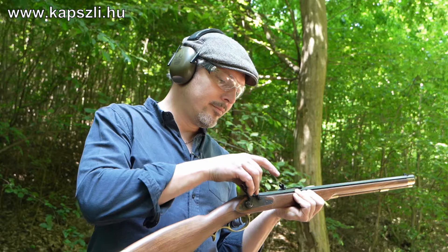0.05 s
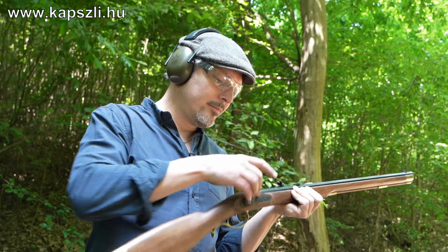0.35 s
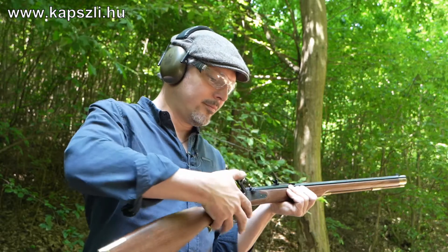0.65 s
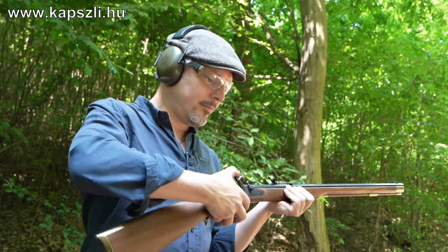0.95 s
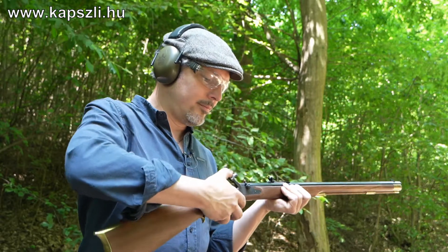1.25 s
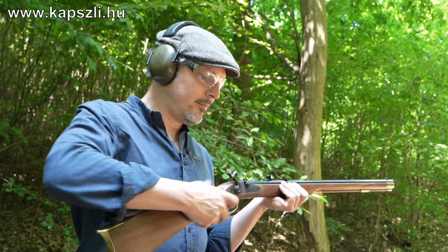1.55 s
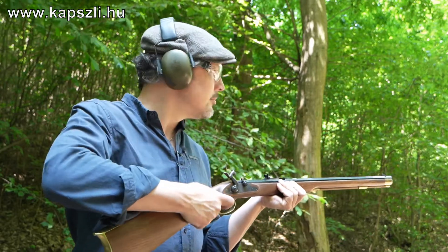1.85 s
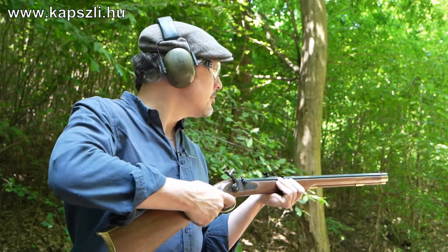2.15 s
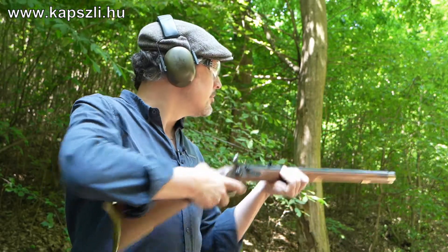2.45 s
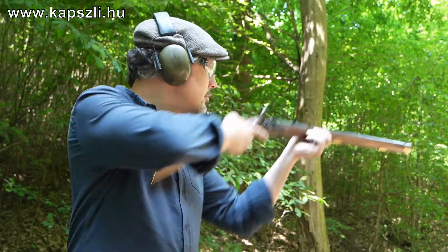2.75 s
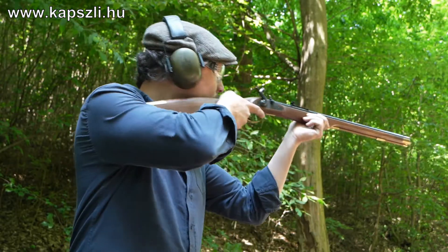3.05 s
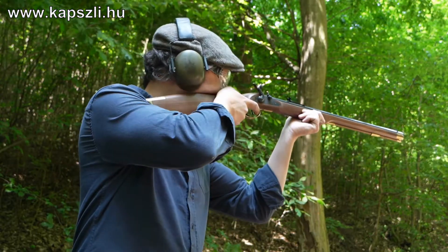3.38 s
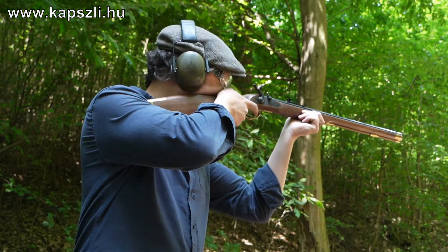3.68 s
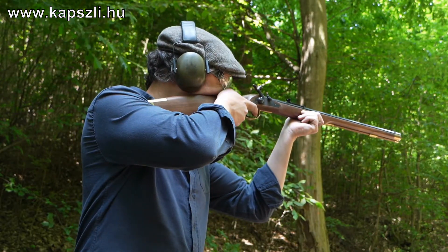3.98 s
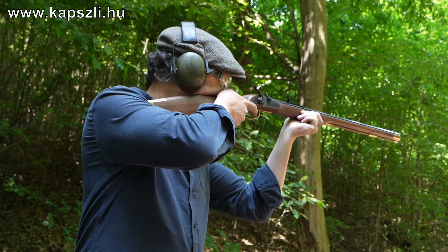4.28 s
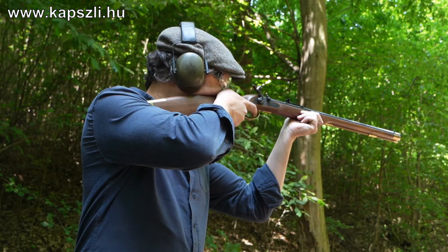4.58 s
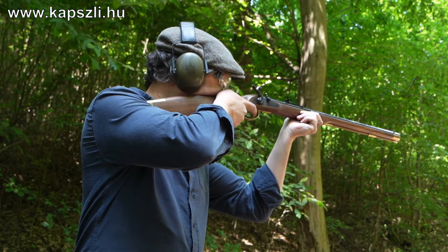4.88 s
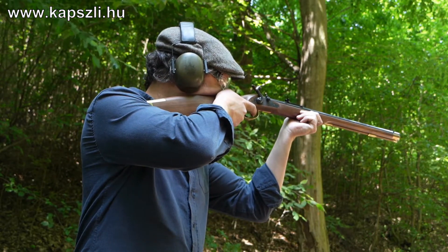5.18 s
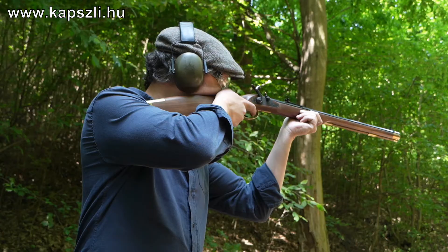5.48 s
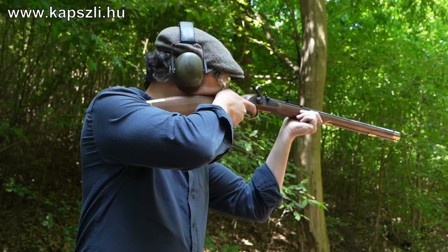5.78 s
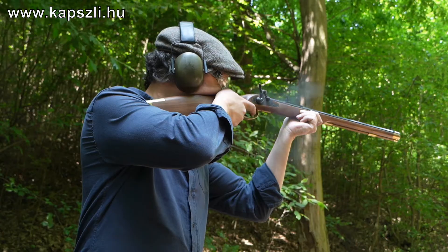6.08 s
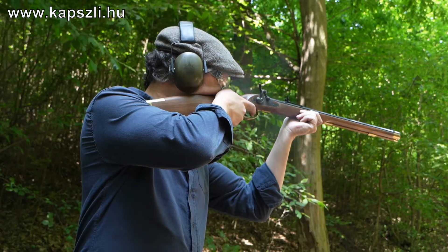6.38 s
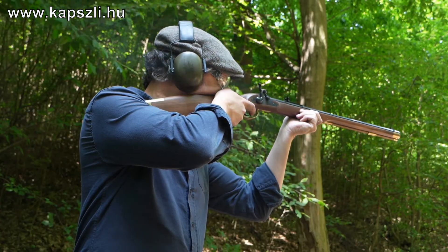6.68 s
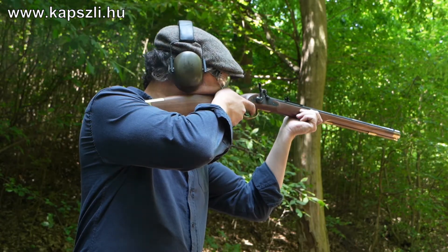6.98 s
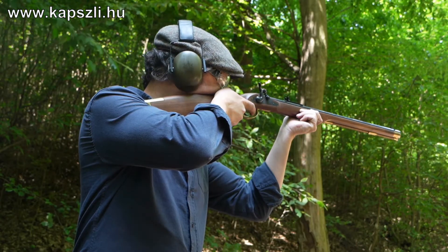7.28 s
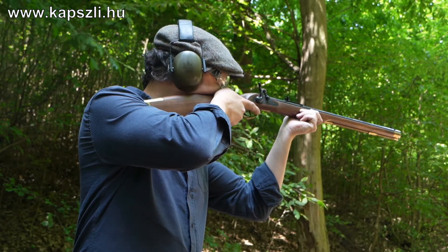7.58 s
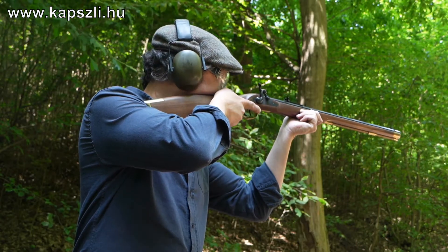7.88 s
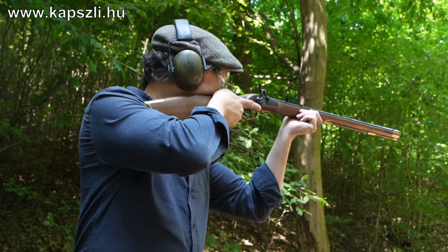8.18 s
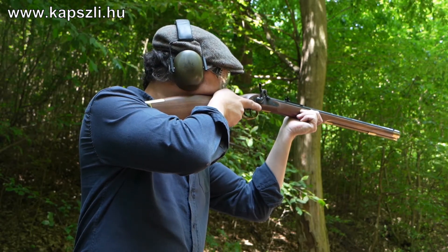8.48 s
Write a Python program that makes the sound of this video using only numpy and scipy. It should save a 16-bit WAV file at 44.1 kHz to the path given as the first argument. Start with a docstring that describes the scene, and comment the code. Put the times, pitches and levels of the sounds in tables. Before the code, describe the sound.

A rifle lock clicks, sleeves rustle, and after a pause one sharp crack echoes through a wood with faint birdsong.

```python
"""A muzzleloader in a leafy wood

A rifle is cocked and shouldered: impacts in the lock and on the stock excite damped modes, and sleeves
rustle by friction. The percussion lock fires; the blast overloads the microphone and rolls away as the
trees scatter it. One songbird warbles, another spins an accelerating trill and a third calls from far
off, all reverberating between the trunks over the hush of a breeze."""
import sys
import numpy as np
from scipy import signal
from scipy.fft import rfft, irfft, next_fast_len
from scipy.io import wavfile

SR = 44100
rng = np.random.default_rng(int(sys.argv[2]) if len(sys.argv) > 2 else 0)


def bounce(signal):
    """Save signal as a 16-bit WAV file at the path given by the first command-line argument."""
    frames = np.transpose(np.atleast_2d(signal))
    limited = np.clip(frames, -1, 1)
    pcm = np.round(limited * 32767).astype(np.int16)
    wavfile.write(sys.argv[1], SR, pcm)


N = 385740

# noise spectra of the gas jet, its roll through the wood and a dull, far answer: f/Hz, level/dB
JET_SPECTRUM = [(35, -43), (60, -16.5), (149, -11.5), (666, -5), (822, -4), (1220, -7.5), (1340, -6.5),
                (1820, -7), (2090, -6), (2840, -8.5), (4320, -8), (5090, -5), (7940, -12), (13000, -14.5),
                (16000, -22)]
ROLL_SPECTRUM = [(40, -35.5), (110, -19), (175, -18.5), (250, -28), (310, -16), (400, -12), (800, -13.5),
                 (1150, -9.5), (1700, -6.5), (2400, -9), (3800, -2.5), (5800, -4.5), (8000, -14),
                 (10500, -11.5), (16000, -34.5)]
ANSWER_SPECTRUM = [(100, -58), (280, -14.5), (450, -4.5), (780, 1), (1200, -6), (1700, -5), (3000, -14),
                   (8000, -51)]
# stereo width of the shot and its echoes: f/Hz, side minus mid/dB
SHOT_WIDTH = [(50, -13.5), (700, -30), (4000, -28), (8000, -16.5), (15000, -13)]
# modes of the barrel and its air column: f/Hz, level/dB, T60/s
BORE_MODES = [(172, -6.5, 0.05), (836, -12, 0.17), (2104, 2.5, .05)]
# reflections from single trunks: t/s, level/dB, pulse width/s
TRUNK_ECHOES = [(6.202, 10, .00007), (6.247, 1, 0.00015), (6.2864, 10, 0.000094), (6.2946, -6, 0.000096)]

def shot(fire_s=6.1285, jet_hold_s=.017, jet_rise_s=.00068, jet_t60=.11):
    """Blast wave: expanding gas drives a pressure front and a turbulent jet; trees reflect the sound."""
    t, out = np.arange(2 * SR) / SR, np.zeros((2, N))
    jet = decay(t, jet_t60, jet_hold_s) * rise(t, jet_rise_s)
    roll = tree_scatter(ROLL_SPECTRUM, hold_s=.099, grain_db=0, width=SHOT_WIDTH) * rise(t, .052)
    answer = tree_scatter(ANSWER_SPECTRUM, hold_s=.022, grain_db=2, width=SHOT_WIDTH) * rise(t, .016)
    add(out, fire_s, -from_db(8) * pressure_pulse(width_s=.00027))   # the front
    add(out, fire_s, jet * noise(JET_SPECTRUM, len(t), SHOT_WIDTH) + from_db(-13) * roll)
    add(out, fire_s, struck(BORE_MODES))
    # a low thump just after the crack
    add(out, fire_s + .009, from_db(-3) * pressure_pulse(width_s=.0012))
    add(out, fire_s + .075, from_db(-19) * answer)
    for s, db, width_s in TRUNK_ECHOES:
        add(out, s, from_db(db) * pressure_pulse(width_s))
    return out


def pressure_pulse(width_s):
    """Friedlander wave: a sudden compression followed by a weaker, longer rarefaction."""
    phase = np.arange(SR // 25) / SR / width_s
    return (1 - phase) * np.exp(-phase)


# modes of stock, lock plate and barrel: f/Hz, level/dB, T60/s
RIFLE_MODES = [(340, -17, .04), (585, -18, 0.068), (940, -30, 0.018), (1478, -1, 0.07), (1540, 3.5, 0.025),
               (2190, 3, 0.028), (2370, -9, .04), (2605, -5, 0.072), (3010, 2.5, 0.023),
               (3424, -20.5, 0.046), (4320, -7, .035), (4970, -11.5, 0.032), (6700, -15, 0.038),
               (8317, -12.5, .025)]
# modes of a hand-damped knock and of the sear snapping into its notch: frequency ratio, level/dB, T60/s
KNOCK_MODES = [(.52, -16.5, .02), (.8, -3, .016), (1.002, 5, 0.016), (1.17, -4, 0.02), (1.7, -19.5, 0.011),
               (2.3, -14, 0.005)]
SNAP_MODES = [(0.598, -3.5, .007), (.79, 6.5, 0.0029), (0.971, 3.5, 0.0052), (1.059, -6.5, 0.0096),
              (1.32, 0.5, .004), (1.778, 1, 0.0029), (2.199, -6, .003)]
# steel grating on steel: f/Hz, level/dB; and its stereo width: f/Hz, side minus mid/dB
GRIT_SPECTRUM = [(100, -8.5), (500, -0.5), (4000, -0.5), (8000, -3), (13000, 4), (16000, -3)]
GRIT_WIDTH = [(100, -4), (16000, -5.5)]
# clicks of the lock: t/s, ring level/dB, knock level/dB, knock f/Hz, snap level/dB, snap f/Hz
LOCK_CLICKS = [(1.153, -12.5, -9, 2990, 4, 7040), (1.3496, -37, -19, 2355, -25.5, 5170),
               (1.378, -60, -46, 2520, -41, 6540), (2.2107, -27, -15, 2840, -0.5, 5120),
               (2.349, -40, -26, 1930, -37, 8100)]
# hands and shoulder bump the stock: t/s, knock level/dB, knock f/Hz, level of the fittings' tick/dB
STOCK_BUMPS = [(2.162, -37.5, 1620, -46), (2.3553, -33.5, 1470, -55), (2.443, -40, 774, -31),
               (2.508, -33.5, 2380, -39), (2.592, -35, 1640, -35), (2.654, -32, 1680, -34),
               (2.675, -33.5, 1320, -74), (2.828, -37.5, 616, -47), (2.919, -47, 895, -54),
               (2.977, -44, 710, -45), (3.047, -40, 960, -43), (3.092, -36, 615, -47),
               (3.23, -32.5, 586, -39), (3.429, -35, 570, -34), (7.320, -40, 1590, -43),
               (7.943, -41.5, 1123, -36.5), (7.984, -42.5, 790, -40.5), (8.124, -47.5, 690, -49)]

def rifle_handling(body_rise_s=.0006, snap_rise_s=.00028, bump_ring_db=-13, tick_hz=4870, grit_db=-25):
    """Impact excitation: each contact snaps and grates the steel, knocks the wood and rings the rifle."""
    hz, mode_db, t60 = np.transpose(RIFLE_MODES)
    t, impacts, grit = np.arange(SR // 6) / SR, np.zeros(N), np.zeros((2, N))
    bumps = [(s, db + bump_ring_db, db, knock_hz, tick_db, tick_hz)
             for s, db, knock_hz, tick_db in STOCK_BUMPS]
    for s, ring_db, knock_db, knock_hz, snap_db, snap_hz in LOCK_CLICKS + bumps:
        ring_hz = hz * rng.normal(1, .0073, len(hz))   # no two blows ring quite alike
        uneven_db = mode_db + rng.normal(0, .64, len(hz))
        ring = struck(zip(ring_hz, uneven_db, t60), gain_db=ring_db)
        knock = struck(KNOCK_MODES, knock_hz, knock_db)
        snap = struck(SNAP_MODES, snap_hz, snap_db)
        add(impacts, s, (ring + knock) * rise(t, body_rise_s) + snap * rise(t, snap_rise_s))
        grating = noise(GRIT_SPECTRUM, len(t), GRIT_WIDTH) * decay(t, t60=.031)
        add(grit, s, from_db(snap_db + grit_db) * grating)
    near = early_reflections(impacts, wet_db=-18, t60=.07, spread=.8)
    return wood_reverb(near + grit, wet_db=-37, hold_s=.012, rise_s=.006)


# friction spectra of cloth, a dull rub and a hiss: f/Hz, level/dB
RUB_SPECTRUM = [(41, -25.5), (70, 2.5), (368, -8.5), (504, -5.5), (660, -9), (744, -10.5), (1750, -17),
                (2500, -41.5), (3250, -54), (5500, -120)]
HISS_SPECTRUM = [(880, -25), (1500, -19), (2270, -2.5), (2610, -6), (3060, -7.5), (8000, -9.5),
                 (16000, -16)]
# strokes of the arms: t/s, duration/s, relative rub level/dB, relative hiss level/dB
SLEEVE_STROKES = [(1.428, 0.18, -56, -55), (1.617, 0.32, -53.5, -61.5), (2.402, 0.11, -51.5, -52),
                  (2.547, 0.23, -49, -53.5), (2.778, 0.16, -48.5, -57), (2.958, 0.21, -46.5, -54.5),
                  (3.081, 0.15, -48.5, -50)]

def sleeves(rub_gain_db=-2, hiss_gain_db=1, attack_s=.053, release_t60=.28):
    """Stick-slip friction: sliding cloth radiates grainy noise that builds, holds and dies each stroke."""
    t, rub, hiss = np.arange(SR) / SR, np.zeros(N), np.zeros(N)
    for s, length, rub_db, hiss_db in SLEEVE_STROKES:
        stroke = np.minimum(t / attack_s, 1) * decay(t, release_t60, hold_s=length)
        add(rub, s, from_db(rub_db + rub_gain_db) * stroke)
        add(hiss, s, from_db(hiss_db + hiss_gain_db) * stroke)
    rub *= from_db(3 * flutter(83, N))
    hiss *= from_db(2 * flutter(280, N))
    return rub * noise(RUB_SPECTRUM, N) + hiss * noise(HISS_SPECTRUM, N)


# notes of a near and a far bird: t/s, duration/s, first f/Hz, last f/Hz, relative level/dB
NEAR_SONG = [(1.80, .031, 4200, 3620, -49.5), (1.916, .035, 2750, 3400, -44),
             (1.973, .036, 3250, 2500, -47.5), (3.835, .05, 3450, 4300, -45),
             (3.932, .085, 2550, 3430, -42.5), (4.105, .055, 3950, 2300, -42.5),
             (4.185, .04, 2150, 2480, -43.5), (4.342, .054, 2000, 2600, -43.5),
             (4.436, .047, 3140, 3070, -37), (4.66, .028, 4800, 4204, -47),
             (4.816, .076, 2550, 2950, -40.5), (4.905, .03, 2990, 2965, -35),
             (5.125, .068, 4100, 3300, -40), (5.182, .032, 3100, 2680, -37.5),
             (5.272, .056, 4500, 4600, -46), (5.342, .039, 4500, 3740, -38), (5.452, .027, 3900, 2750, -44),
             (5.472, 0.029, 2492, 2380, -39.5), (5.504, 0.023, 2416, 2146, -42.5),
             (5.668, .098, 3800, 3240, -34), (5.821, .041, 4200, 4125, -34.5),
             (5.999, .026, 4150, 2700, -38.5), (6.026, .12, 2500, 3250, -34),
             (6.542, .061, 3500, 3620, -34.5), (6.60, .043, 3400, 2744, -37.5),
             (6.667, .024, 2900, 3093, -35.5), (6.771, .085, 4600, 3750, -38.5),
             (6.921, .034, 3850, 3090, -40.5), (6.943, .046, 3100, 3005, -31),
             (6.997, .033, 2950, 2730, -43.5), (7.075, .095, 2200, 2525, -39)]
FAR_SONG = [(1.55, 0.056, 1840, 1970, -55), (1.58, 0.032, 2490, 2420, -52.5),
            (1.76, 0.1, 2200, 2320, -53.5), (2.02, 0.066, 1905, 1800, -51), (2.49, 0.016, 4450, 4150, -43),
            (3.25, 0.13, 2146, 2080, -59), (3.83, 0.073, 2470, 2350, -63), (3.93, 0.07, 2250, 2030, -57),
            (4.63, .045, 1580, 1710, -59.5), (4.72, 0.054, 1995, 2130, -57), (4.9, 0.074, 2455, 2454, -55),
            (5.01, .045, 2030, 2200, -55), (5.57, .029, 1880, 1720, -60), (8.5, 0.043, 2080, 2500, -65.5)]

def songbirds():
    """Direct-to-reverberant ratio: leaves blur the near song; the far one arrives mostly as echo."""
    near = from_db(-2) * whistles(NEAR_SONG, waver=.005, slide_waver=.27)
    far = from_db(-10) * whistles(FAR_SONG, waver=.025, slide_waver=.15)
    near = early_reflections(near, wet_db=-13.5, t60=.12, spread=.05)
    return (wood_reverb(near, wet_db=-5, hold_s=.02, rise_s=.0072)
            + wood_reverb(far, wet_db=9.5, hold_s=.017, rise_s=.0055))


def whistles(notes, waver, slide_waver, glide_s=.022):
    """Frequency modulation: each tone glides exponentially to its pitch, trembling more in fast slides."""
    out = np.zeros(N)
    for s, length, first_hz, last_hz, db in notes:
        t = np.arange(int(length * SR)) / SR
        remaining = np.exp(-t / glide_s)
        glide_hz = last_hz + (first_hz - last_hz) * (remaining - remaining[-1]) / (1 - remaining[-1])
        depth = waver + slide_waver * remaining * abs(np.log(last_hz / first_hz))
        hz = glide_hz * (1 + depth * flutter(600, len(t)))
        envelope = np.sqrt(np.abs(np.sin(np.pi * t / length)))
        add(out, s, from_db(db) * envelope * tone(hz))
    return out


# one upward flick of the trill: t/s from its onset, f/Hz before the pitch ratio, relative level/dB
FLICK_SWEEP = [(0, 3450, -10), (.007, 4100, -3), (.012, 4620, -.5), (.017, 5200, -1), (.020, 5600, 0),
               (.023, 6050, 1.5), (.028, 6800, -1.5), (.034, 7550, -8)]
# runs of flicks: start t/s, end t/s, period/s, change of period per flick/s
TRILL_RUNS = [(2.066, 3.0, .126, 0), (3.279, 3.9, .1137, 0), (3.95, 4.17, .101, -.015),
              (4.209, 6.0, .0616, .00028)]
# how hard the bird sings: t/s, level/dB, gain of the sweep's lower part/dB, pitch ratio
TRILL_EFFORT = [(2.1, -50.5, -28, 1.19), (3.0, -63, -30, 0.9), (3.3, -42.5, -13, 1.04),
                (3.7, -44, -9.5, 1.004), (4.25, -46, -1.5, 0.97), (4.7, -45.5, 2.5, 1.0),
                (5.6, -44, -4, .99), (6.0, -52, 2.5, 0.99)]

def trilling_bird(lead_s=.025, min_period_s=.05, waver=.013, uneven_db=2, notch_hz=5550, notch_q=5):
    """Chirp train: rising sweeps hurry into a trill; a notch splits each direct one into chirp and tick."""
    flick_s, flick_hz, flick_db = np.transpose(FLICK_SWEEP)
    effort_s, *effort = np.transpose(TRILL_EFFORT)
    t, trill = np.arange(int(flick_s[-1] * SR)) / SR, np.zeros(N)
    sweep_hz, sweep_db = np.interp(t, flick_s, flick_hz), np.interp(t, flick_s, flick_db)
    lower_part = np.interp(sweep_hz, [5600, 6000], [1, 0])
    window = signal.windows.tukey(len(t), .15)
    for start, end, period, change in TRILL_RUNS:
        periods = np.maximum(period + change * np.arange(40), min_period_s)
        times = start + np.append(0, np.cumsum(periods))
        for s in times[times < end]:
            db, lower_db, pitch = (np.interp(s, effort_s, column) for column in effort)
            hz = pitch * sweep_hz * (1 + waver * flutter(500, len(t)))
            level_db = db + sweep_db + lower_db * lower_part + uneven_db * flutter(200, len(t))
            add(trill, s - lead_s, from_db(level_db) * window * tone(hz))
    # the middle of the sweep arrives only as echo
    direct_middle = signal.lfilter(*signal.iirpeak(notch_hz, notch_q, fs=SR), trill)
    return wood_reverb(trill, wet_db=-2, hold_s=.06, rise_s=.008) - direct_middle


# spectra of the breeze's hush and of its swells: f/Hz, level/dB
HUSH_SPECTRUM = [(12, -29), (20, 1.5), (44, -1.5), (91, -8), (123, -12), (285, -17), (388, -14), (558, -16),
                 (1710, -26), (2200, -23), (3160, -27), (4670, -28.5), (5850, -33), (14700, -36),
                 (16000, -44.5)]
SWELL_SPECTRUM = [(60, -12), (200, 1), (400, 5), (700, -4.5), (1400, -14), (2200, -8.5), (4500, -19.5),
                  (7000, -31.5), (16000, -39.5)]
# soft swells: peak t/s, half width/s, level/dB
BREEZE_SWELLS = [(.25, 0.19, -55.5), (1.8, 0.5, -68.5), (3.6, 0.55, -59.5), (8.55, 0.31, -62)]

def breeze(hush_db=-52.5, waver_db=1.33):
    """Flow noise: moving air makes a low, wavering hush with a few Gaussian swells."""
    t = np.arange(N) / SR
    swells = sum(from_db(db) * np.exp(-((t - s) / width) ** 2) for s, width, db in BREEZE_SWELLS)
    hush = from_db(hush_db + waver_db * flutter(42, N)) * noise(HUSH_SPECTRUM, N)
    return hush + swells * noise(SWELL_SPECTRUM, N)


# reverberation time of the wood: f/Hz, T60/s
WOOD_T60 = [(100, 0.78), (300, 0.84), (700, 1.51), (1600, 1.32), (4000, 0.88), (8000, 0.69), (13000, 0.5)]
# stereo width of diffuse sound: f/Hz, side minus mid/dB
DIFFUSE_WIDTH = [(50, -32.5), (300, -30.5), (1000, -44.5), (3000, -43), (8000, -29.5), (15000, -12)]

def tree_scatter(spectrum, hold_s, grain_db, width=DIFFUSE_WIDTH):
    """Multiple scattering: the level holds while near trees answer, then decays, fastest in the treble."""
    t = np.arange(2 * SR) / SR
    scatter = rfft(noise(spectrum, len(t), width) * from_db(grain_db * flutter(900, len(t))))
    log_hz = np.log(np.maximum(np.fft.rfftfreq(len(t), 1 / SR), 1))
    centres, out = np.geomspace(60, 16000, 14), 0
    for hz, weights in zip(centres, np.eye(len(centres))):
        band = irfft(scatter * np.interp(log_hz, np.log(centres), weights))
        out = out + band * decay(t, at_hz(WOOD_T60, hz), hold_s)
    return out


def wood_reverb(x, wet_db, hold_s, rise_s):
    """Reverberation: a diffuse field from trunks and leaves builds up behind the direct sound."""
    response = tree_scatter([(100, 0), (16000, 0)], hold_s, grain_db=0)
    t = np.arange(response.shape[1]) / SR
    return echoed(x, response * rise(t, rise_s), wet_db)


def early_reflections(x, wet_db, t60, spread):
    """Early reflections: surfaces beside the source return quick echoes that differ at each ear."""
    t = np.arange(SR // 6) / SR
    mid, side = rng.standard_normal((2, len(t)))
    return echoed(x, (mid + spread * side * [[1], [-1]]) * decay(t, t60), wet_db)


def echoed(x, response, wet_db):
    """Convolution: the direct sound plus its echoes through an impulse response of energy wet_db."""
    response = response / np.sqrt(np.sum(response[0] ** 2))
    return x + from_db(wet_db) * signal.oaconvolve(np.atleast_2d(x), response, axes=1)[:, :N]


def struck(modes, pitch=1, gain_db=0):
    """Modal superposition: one blow sets off damped sines, their frequencies multiplied by pitch."""
    t = np.arange(SR // 6) / SR
    return sum(from_db(db + gain_db) * decay(t, t60) * np.sin(2 * np.pi * f * pitch * t)
               for f, db, t60 in modes)


def noise(spectrum, size, width=DIFFUSE_WIDTH):
    """Spectral shaping: mid-side stereo noise with the given relative spectral density, at rms 1."""
    padded = next_fast_len(size)
    hz = np.maximum(np.fft.rfftfreq(padded, 1 / SR), 1)
    mid, side = rfft(rng.standard_normal((2, padded)))
    pair = mid + from_db(at_hz(width, hz)) * side * [[1], [-1]]
    shaped = irfft(pair * from_db(at_hz(spectrum, hz)), padded)[:, :size]
    return shaped / np.sqrt(np.mean(shaped ** 2) + 1e-20)


def flutter(rate_hz, size):
    """Random modulation: interpolated Gaussian values with a spread near 1."""
    return np.interp(np.arange(size) / SR * rate_hz, np.arange(4000), rng.standard_normal(4000))


def tone(hz):
    """A sine whose phase is the integral of its frequency."""
    return np.sin(2 * np.pi * np.cumsum(hz) / SR)


def rise(t, rise_s):
    """Exponential approach to 1."""
    return 1 - np.exp(-t / rise_s)


def decay(t, t60, hold_s=0):
    """Exponential decay: after the hold, 60 dB in every t60."""
    return from_db(-60 * np.maximum(t - hold_s, 0) / t60)


def from_db(db):
    return 10 ** (np.asarray(db) / 20)


def at_hz(points, hz):
    """Interpolation along a logarithmic frequency axis."""
    known_hz, values = np.transpose(points)
    return np.interp(np.log(hz), np.log(known_hz), values)


def add(track, s, sound):
    """Mix a sound in at time s."""
    start = max(int(s * SR), 0)
    track[..., start:start + sound.shape[-1]] += sound[..., :track.shape[-1] - start]


def scene():
    """Linear superposition: the pressures of all sources add."""
    return rifle_handling() + sleeves() + shot() + songbirds() + trilling_bird() + breeze()


def record(dry, ceiling=.9, threshold=.38, follow_s=.006, cutoff_hz=15900):
    """Saturation: the microphone overloads, a limiter lowers lasting peaks and a low-pass cuts the top."""
    clipped = dry / (1 + (dry / ceiling) ** 4) ** (1 / 4)
    pole = np.exp(-1 / (follow_s * SR))
    rms = np.sqrt(signal.lfilter([1 - pole], [1, -pole], np.mean(clipped ** 2, axis=0)))
    limited = clipped / np.maximum(rms / threshold, 1)
    return signal.sosfilt(signal.ellip(10, .1, 80, cutoff_hz, fs=SR, output="sos"), limited)


dry = scene()
out = record(dry)
bounce(out)
```